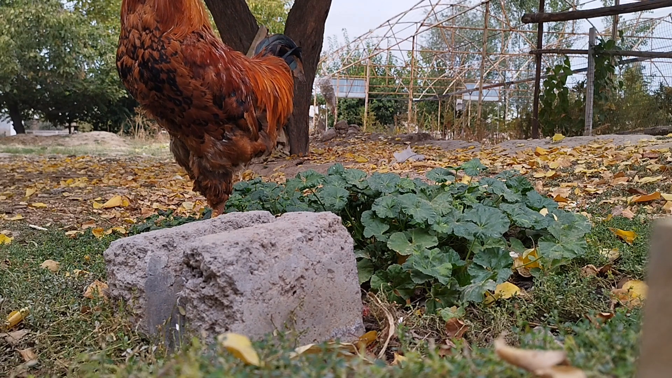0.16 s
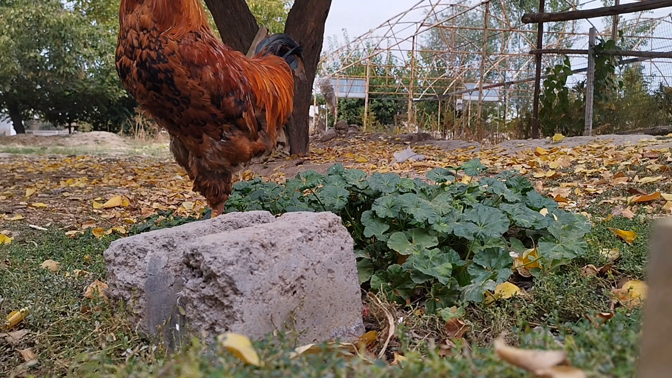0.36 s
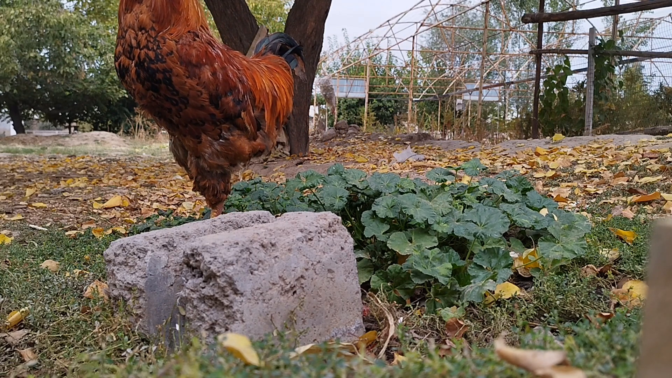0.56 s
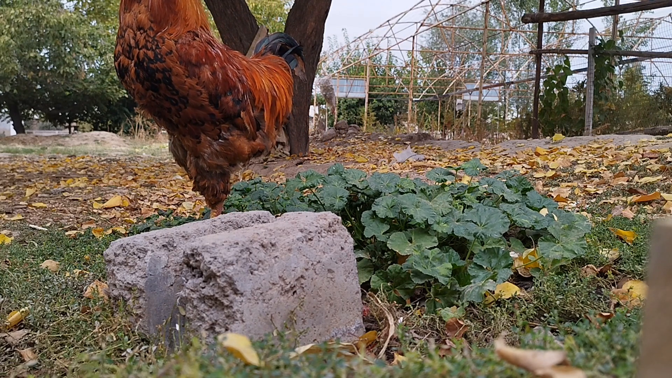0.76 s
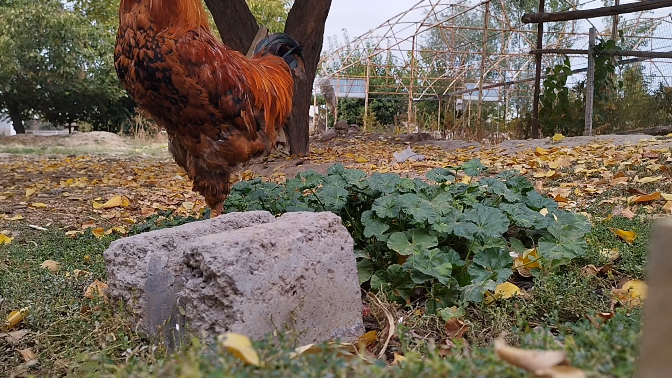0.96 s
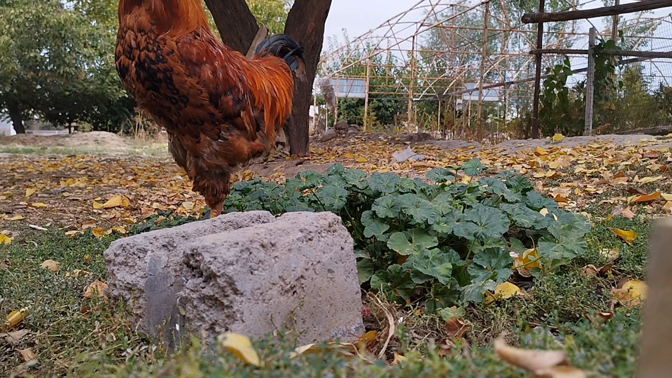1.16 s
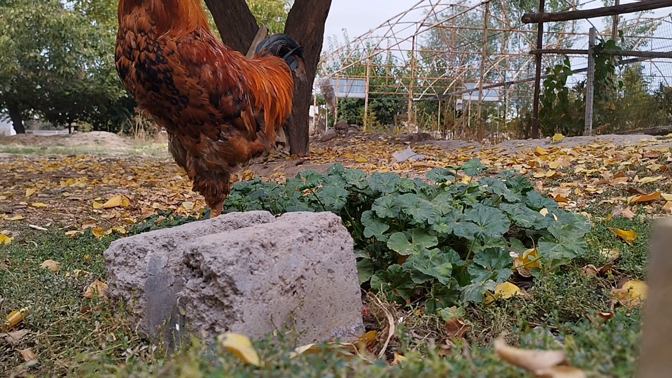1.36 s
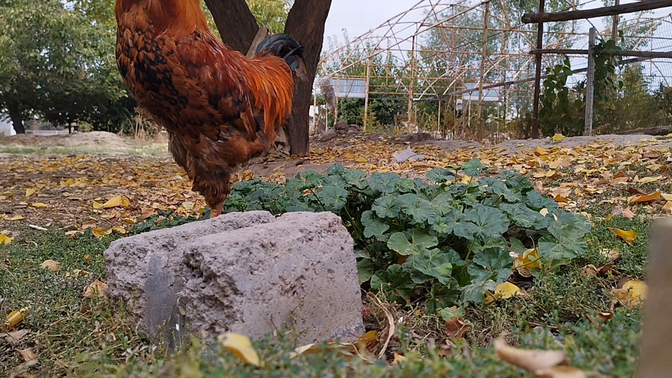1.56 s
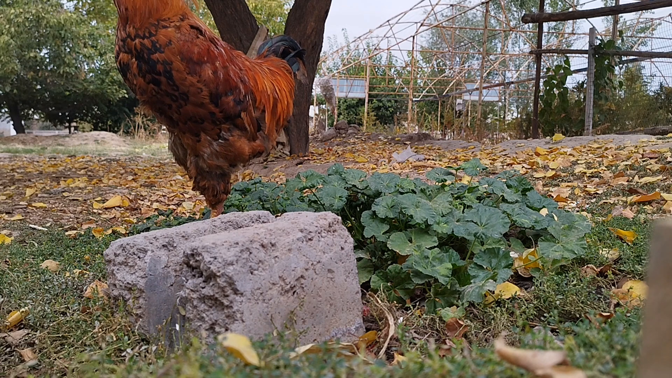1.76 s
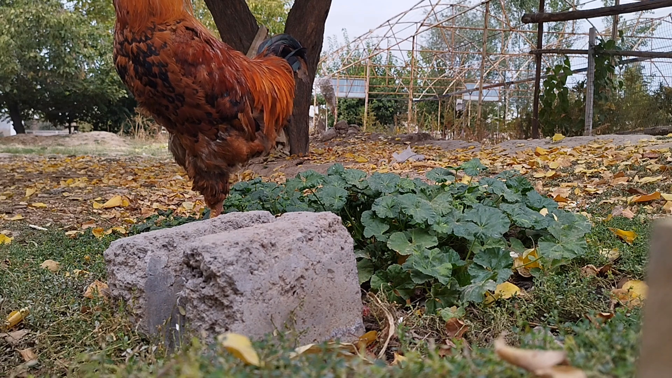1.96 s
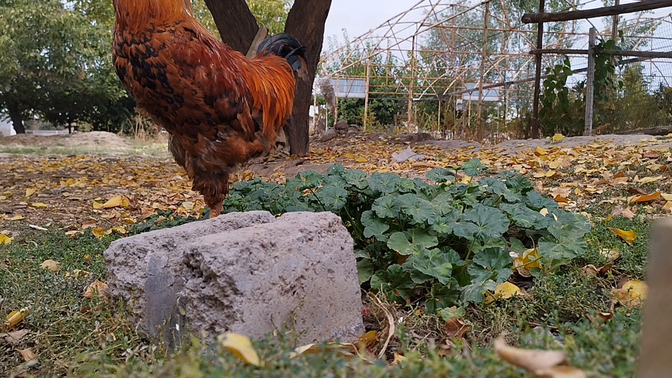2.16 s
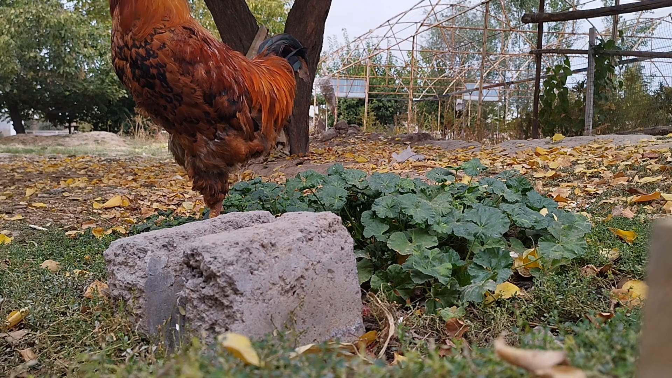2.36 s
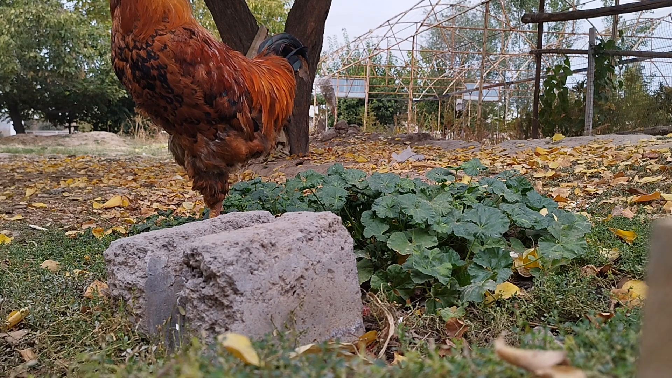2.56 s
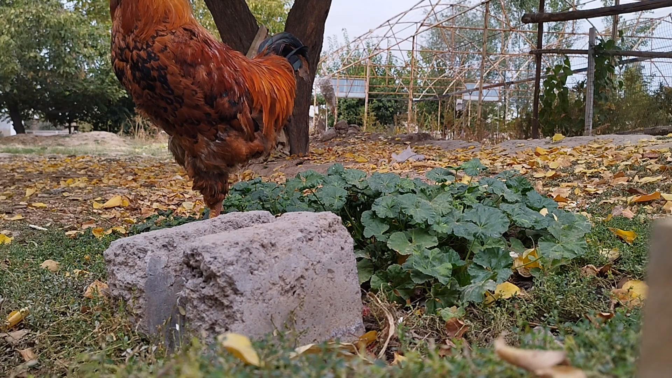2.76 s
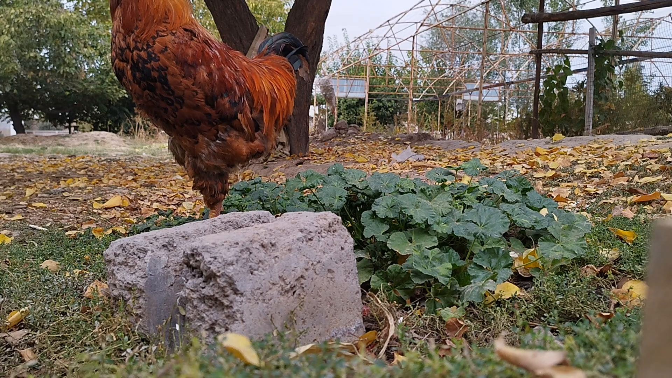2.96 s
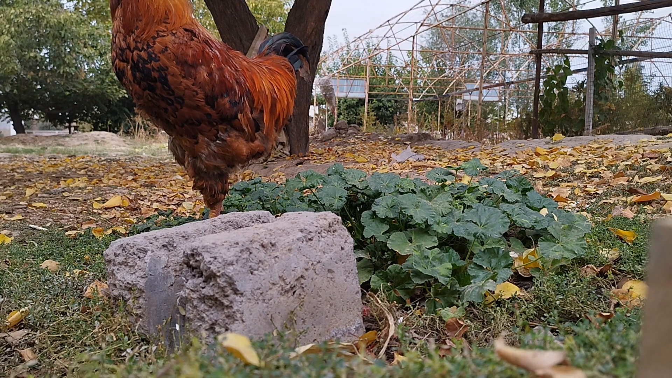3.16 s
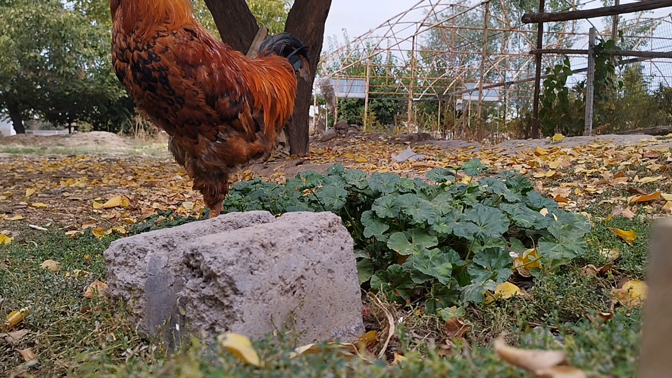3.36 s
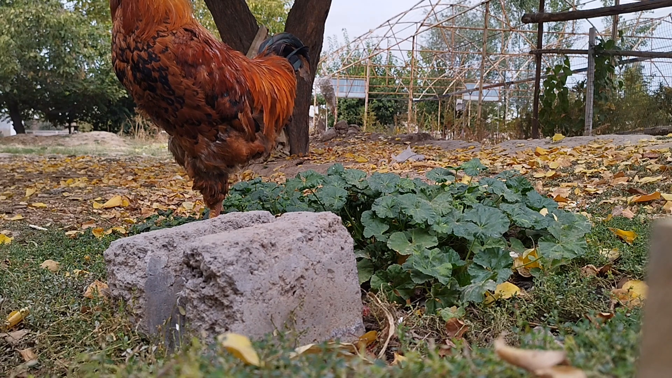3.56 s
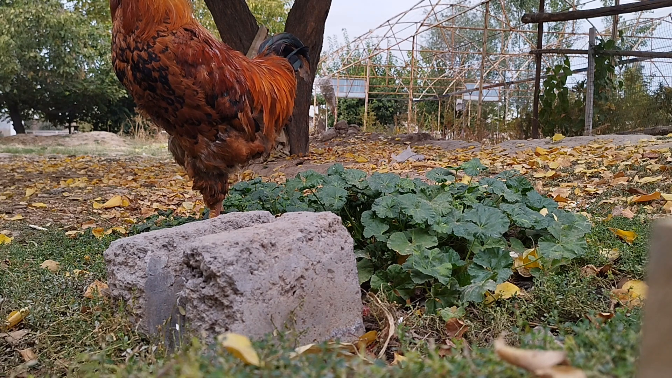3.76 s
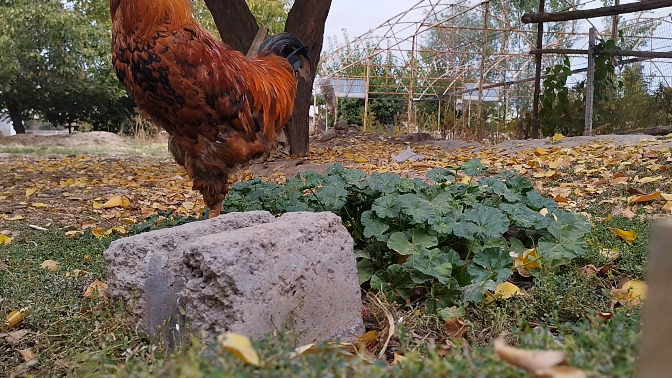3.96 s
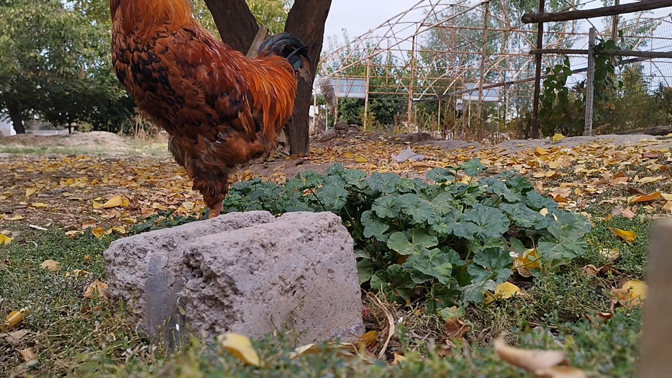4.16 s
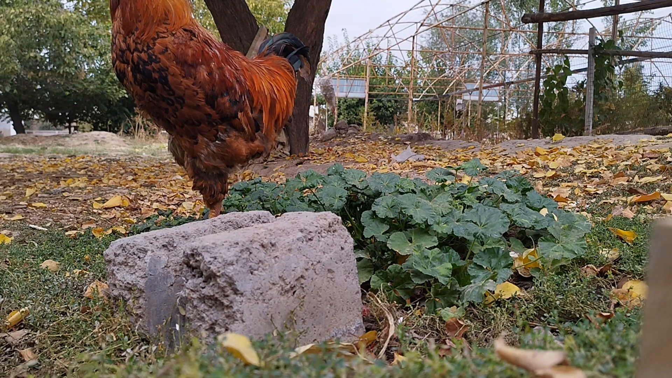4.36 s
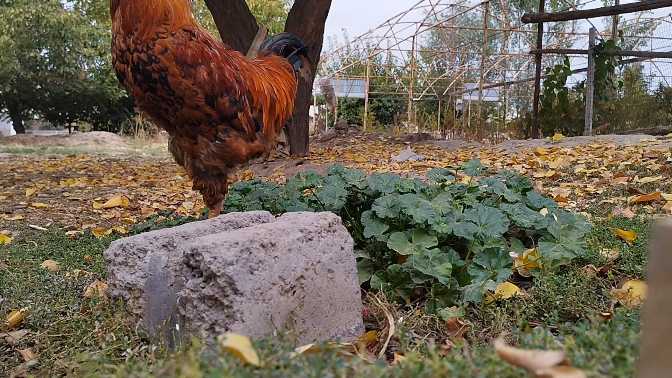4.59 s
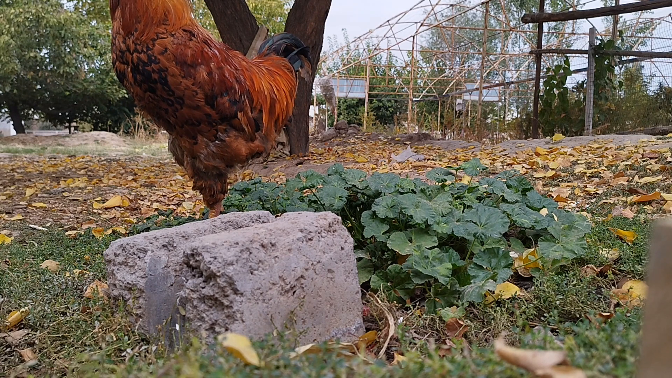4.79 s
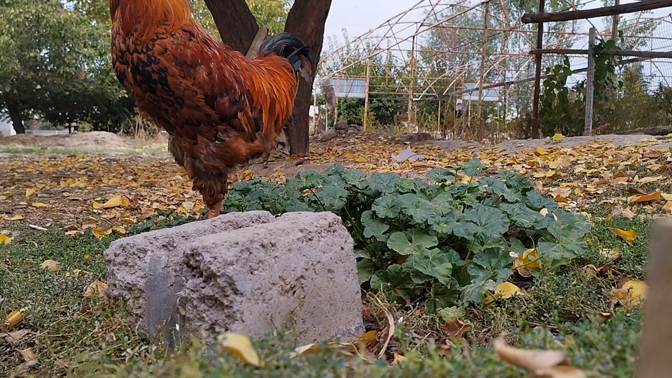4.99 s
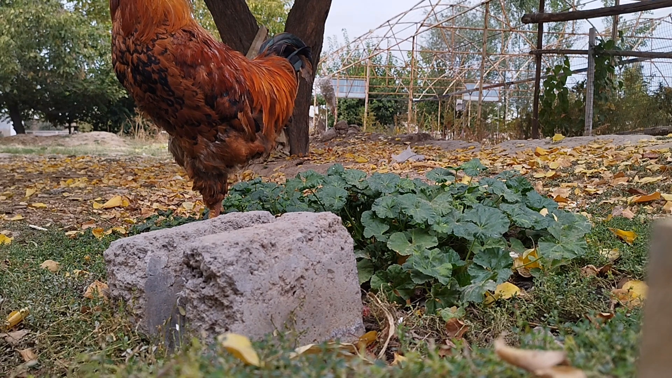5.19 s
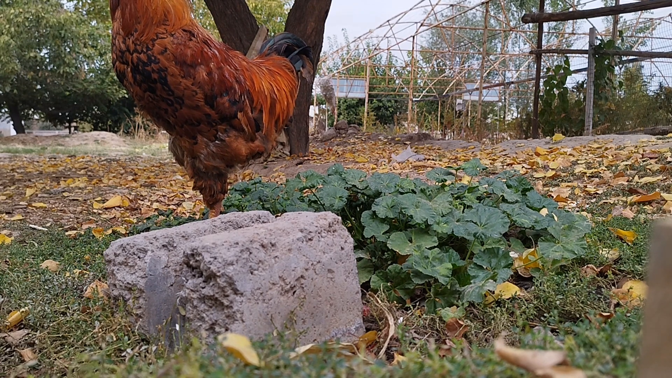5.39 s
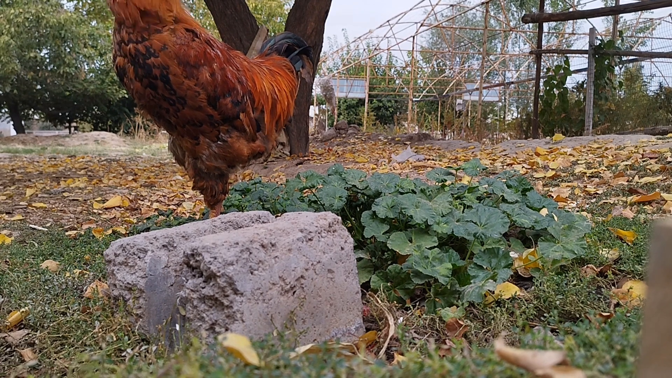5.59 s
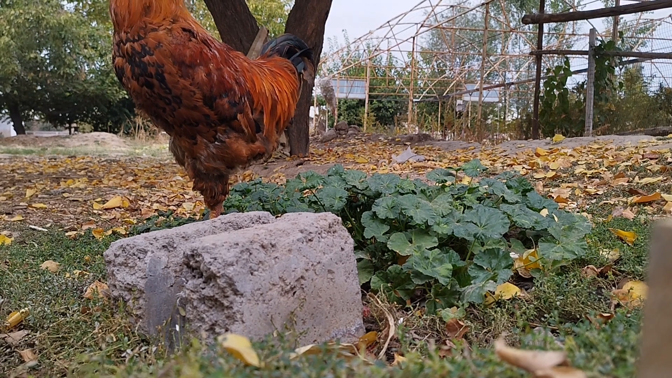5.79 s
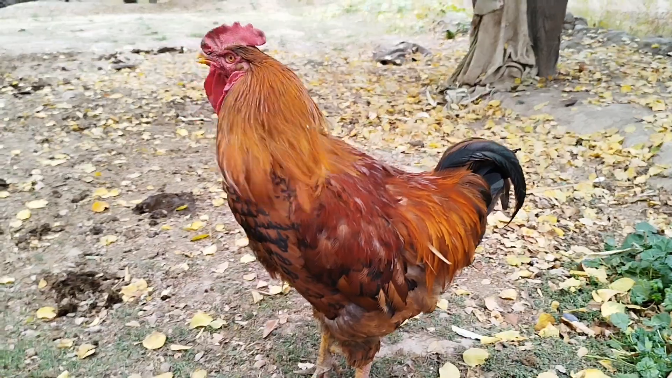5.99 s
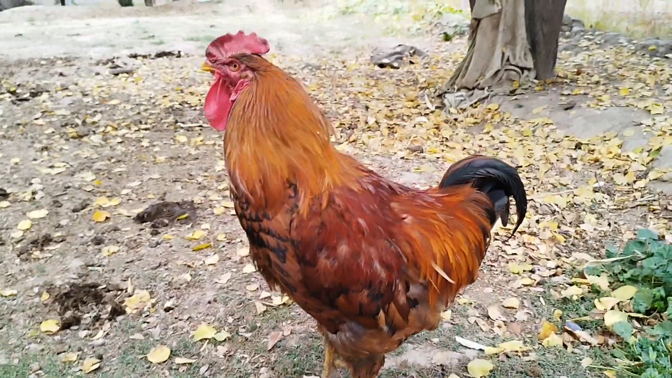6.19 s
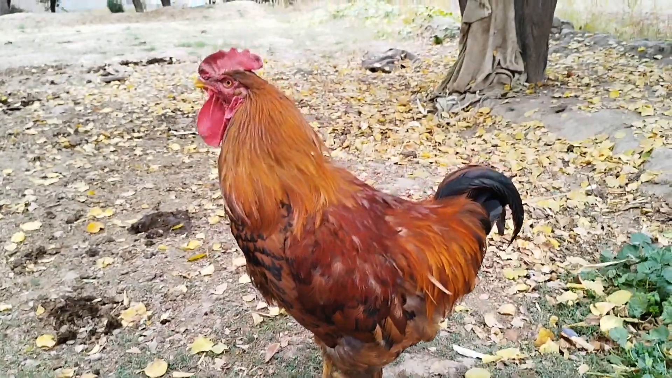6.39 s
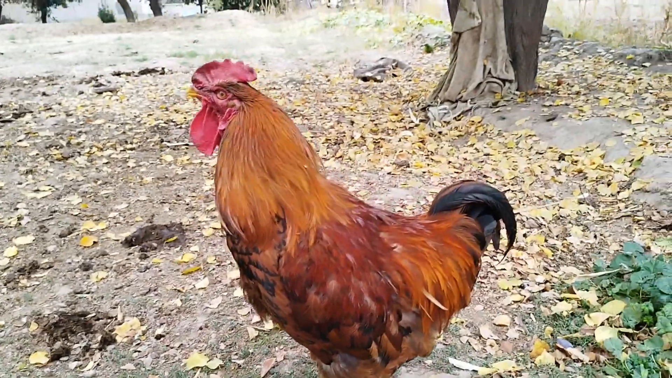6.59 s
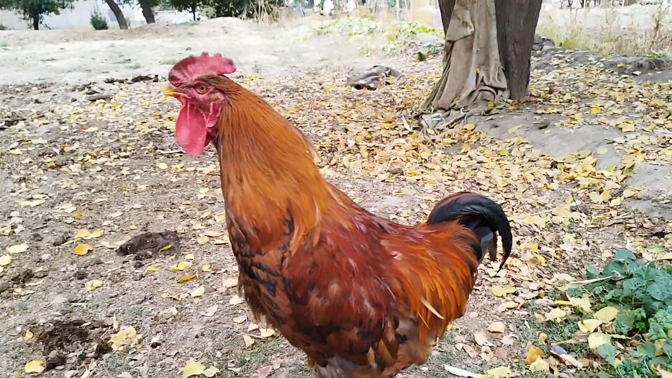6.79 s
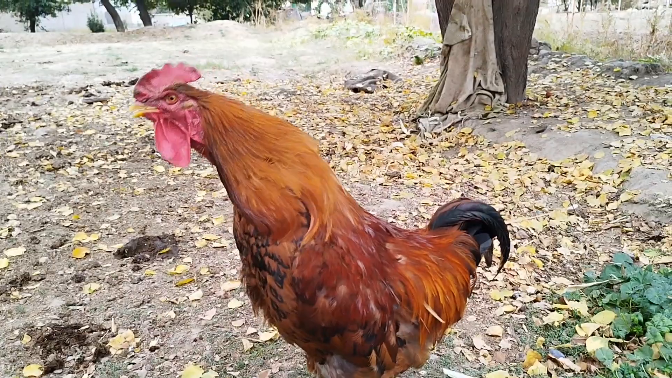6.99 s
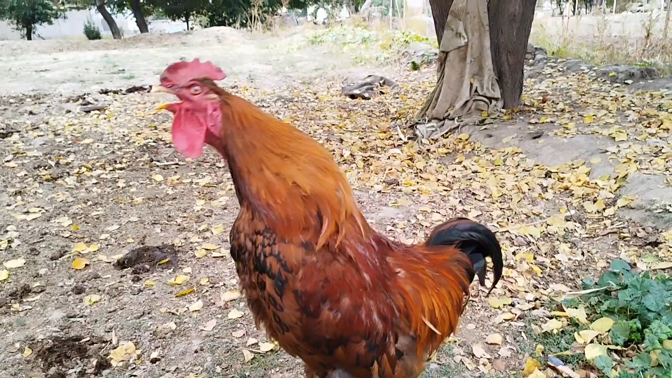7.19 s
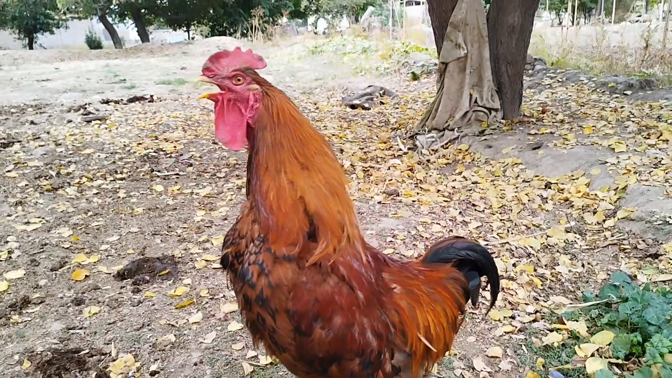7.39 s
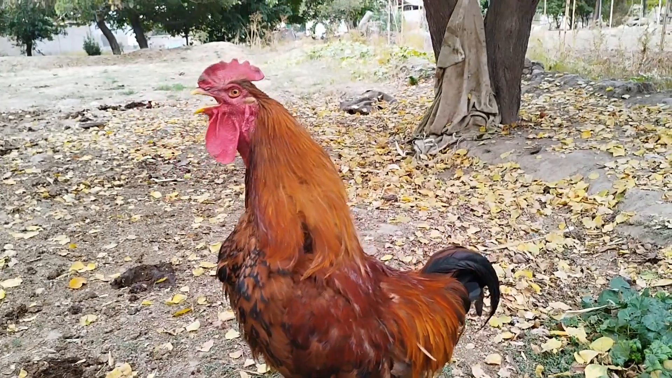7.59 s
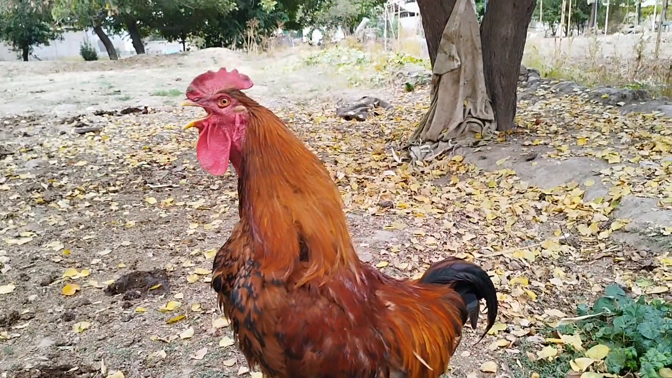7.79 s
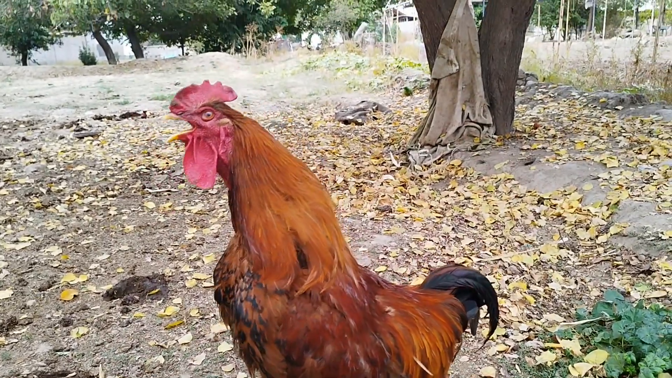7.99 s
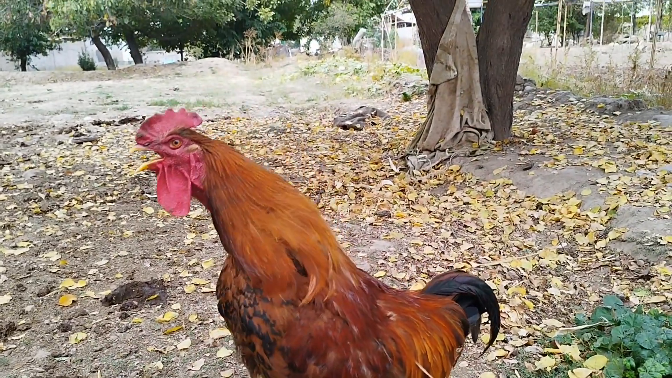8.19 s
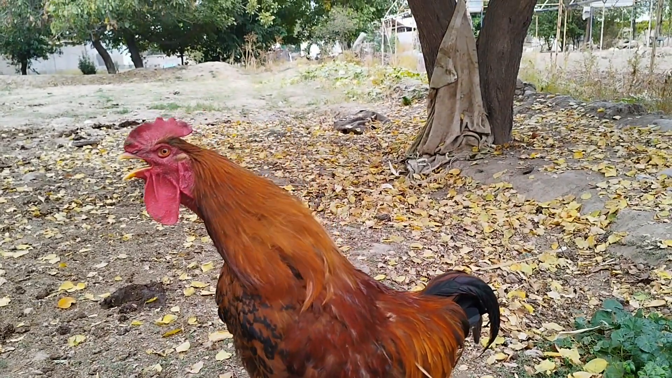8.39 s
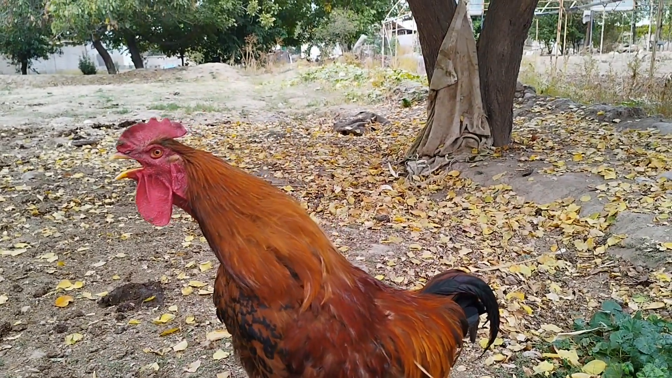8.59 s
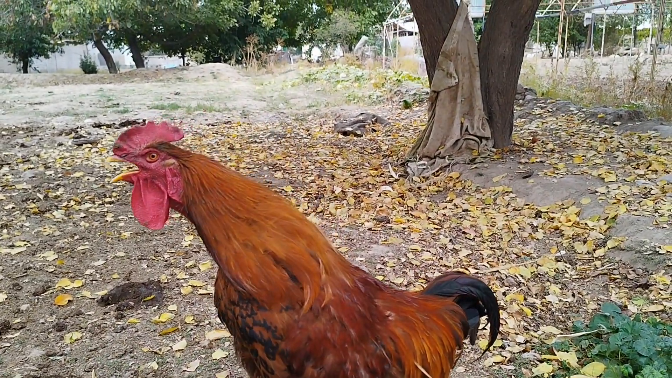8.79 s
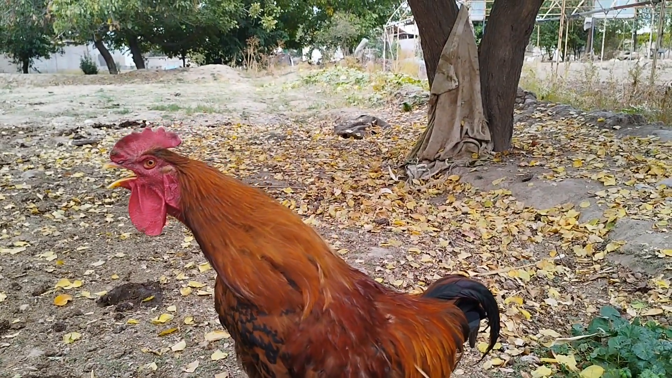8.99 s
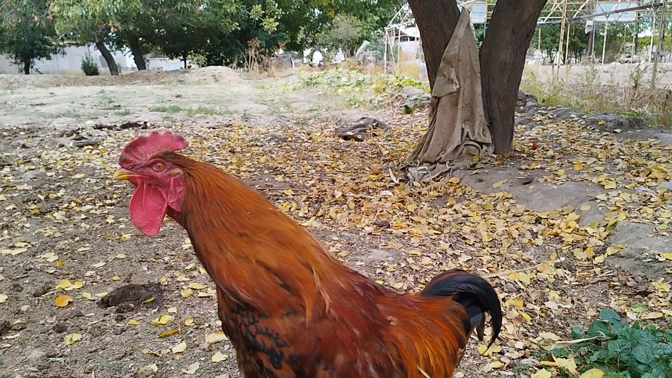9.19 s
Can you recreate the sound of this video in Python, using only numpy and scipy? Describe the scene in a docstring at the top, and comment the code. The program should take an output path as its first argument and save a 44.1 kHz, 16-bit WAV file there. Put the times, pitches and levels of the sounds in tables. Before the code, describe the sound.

An open leafy farmyard in stereo, quiet for the first six seconds. Low distant traffic rumbles under a soft hiss of air in the trees. From 0.5 to 1.5 s come small knocks and dry snaps, the strongest around 0.9 and 1.2 s, with leaf rustles. A small bird trills briefly at 1.6 and 3.8 s; faint far birds chatter near 2.5 s. Light rustles and puffs recur, clearest at 3.6 s, and a faint motor hum rises near 4.9 s. Two tiny whistles sound at 5.8 s, then the level dips almost to silence until 6.0 s. A distant, blurred rooster calls from 6.1 to 7.2 s. At 7.1 s a close rooster crows very loudly, left of center: two short syllables, a rasping stretch from 7.35 s, then a rough held note from 8.0 s, sinking by 9.0 s into a short drop, faint rattle and cluck. Quiet rumble remains.

```python
"""A rooster close by gives one long crow in a leafy farmyard, just after a far rooster calls.
The crow has two short syllables, a rasping stretch and a held note that splits into subharmonics and sinks;
it is a train of air pulses filtered by throat resonances. Before it, the level dips briefly almost to silence.
Around it are noise-burst rustles and puffs, damped clicks, a small bird's frequency-modulated trills, faint
chatter of far birds, and a bed of filtered noise for far traffic and air in the trees, with a motor's hum."""
import sys
import numpy as np
from scipy import signal
from scipy.fft import rfft, irfft, next_fast_len
from scipy.io import wavfile
from scipy.ndimage import uniform_filter1d

SR = 44100
rng = np.random.default_rng(int(sys.argv[2]) if len(sys.argv) > 2 else 0)


def waveform_to_disk(signal):
    """Save audio, clipped to [-1, 1], as 16-bit WAV at the path in sys.argv[1]."""
    frames = np.transpose(np.atleast_2d(signal))
    scaled = np.clip(frames, -1, 1) * 32767
    samples = np.round(scaled).astype(np.int16)
    wavfile.write(sys.argv[1], SR, samples)


N = 407925  # samples
T = np.arange(N) / SR  # seconds
CUTOFF_HZ = 15800  # upper limit of the sound
# The brief near-silence: its start and end in seconds.
SILENCE = (5.86, 5.975)


def from_db(db):
    """Logarithmic level: decibels become an amplitude gain."""
    return 10 ** (np.asarray(db) / 20)


def rms_one(x):
    """Power normalization: scale to unit mean square."""
    return x / np.sqrt(np.mean(x ** 2) + 1e-20)


def in_time(rows, t=T):
    """Linear interpolation: the columns of a time curve, read at times t."""
    times, *columns = np.transpose(rows)
    return [np.interp(t, times, column) for column in columns]


def at_hz(points, hz):
    """Logarithmic frequency scale: interpolate a spectrum along it."""
    f, value = np.transpose(points)
    return np.interp(np.log(hz), np.log(f), value)


def shaped(x, response):
    """Linear filtering: multiply the spectrum by a response given as a function of frequency."""
    size = next_fast_len(x.shape[-1] + 4096, True)
    hz = np.maximum(np.arange(size // 2 + 1) * SR / size, 1)
    return irfft(rfft(x, size) * response(hz), size)[..., :x.shape[-1]]


def drift(rate, t=T):
    """Slow random modulation: spread 1, with a new random target rate times a second."""
    knots = rng.standard_normal(16384)
    return rms_one(np.interp((t - t[0]) * rate, np.arange(len(knots)), knots))


def pulses(phase, pitch):
    """Pulse train: one sharp puff a cycle gives nearly equal harmonics up to about 17 kHz."""
    count = np.floor(17000 / pitch)
    cycle = (phase / (2 * np.pi) + .5) % 1 - .5
    return (count + .5) * np.sinc((2 * count + 1) * cycle) - .5


def placed(x, left_db, lag_ms=0):
    """Interaural cues: a level difference, and a delay on the right, set the direction."""
    right = shaped(x, lambda hz: np.exp(-2j * np.pi * hz * lag_ms / 1e3))
    return np.array([x * from_db(left_db / 2), right * from_db(-left_db / 2)])


def scatter(x, wet_db, t60):
    """Diffuse reflection: ground, trunks and fence return a short exponentially decaying tail."""
    t = np.arange(SR // 2) / SR
    tail = rng.standard_normal((2, len(t))) * from_db(-60 * t / t60) * (t > .002)
    tail /= np.sqrt(np.sum(tail ** 2, axis=1, keepdims=True))
    return x + from_db(wet_db) * signal.fftconvolve(x, tail, axes=1)[:, :x.shape[1]]


# Five frequency bands of the voice. Each row: upper edge in Hz, trim in dB, attack at the start of the
# crow in seconds, dB per octave of pitch, dB per unit of beak opening.
REGISTERS = [(859, -.5, 0.013, -2.5, -8), (1920, 2.5, 0.033, 1, 3), (3650, -15.5, 0.11, 7, -9),
             (7010, -23.5, 0.075, 2, -4), (16100, -21, 0.051, 14, 0.5)]
# Difference between the sides. Each row: frequency in Hz, left minus right in dB.
BEARING = [(400, -4.5), (3300, -7), (7500, -7), (10300, 5.5), (14500, -4.5)]
# Beak in the held note. Each row: time in seconds, opening relative to the usual one (0).
BEAK = [(8.1, 0.29), (8.25, 0.3), (8.58, 0.91), (8.76, 0.32), (8.9, -0.24), (8.97, -0.75)]
# Third register in the held note. Each row: time in seconds, level in dB.
UPPER_MIDS = [(8.434, 5), (8.746, -8), (8.762, 2.5), (8.834, 7.5), (8.955, -16)]
# Two top registers in the held note. Each row: time in seconds, level in dB.
TREBLE = [(8.164, -1.5), (8.284, 5), (8.648, 2.5), (8.732, -13.5), (8.866, 1), (8.955, -0.5)]
# The held note: its start and end in seconds.
HELD_S = (8.032, 8.977)
USUAL_HZ, CROW_S = 706, 7.087  # reference pitch, start of the crow
EBB_S, EBB_LENGTH_S, EBB_DB = 7.329, 0.0083, -5  # the pressure ebbs before the third syllable


def rooster(flutter_db=2.37):
    """Source and filter: the syrinx drives the throat; effort, pitch and beak set each register's level."""
    t = T[7 * SR:]
    pitch, level_db, chest_db, bright_db, rasp, surge_db = notes(t)
    source = syrinx(t, pitch, rasp)
    voice = neck(source, t)
    out = band_flares(source, t)
    unsteady = np.sqrt(np.minimum(rasp, 1))
    held = uniform_filter1d(((t > HELD_S[0]) & (t < HELD_S[1])) * 1., size=600)
    beak = held * in_time(BEAK, t)[0]
    mids_db = held * in_time(UPPER_MIDS, t)[0]
    treble_db = bright_db + held * in_time(TREBLE, t)[0]
    colours_db = chest_db + surge_db, surge_db, mids_db, treble_db, treble_db
    octaves = np.log2(pitch / USUAL_HZ)
    low = 100  # Hz, lower edge of the first register
    for (high, trim_db, attack_s, octave_db, beak_db), colour_db in zip(REGISTERS, colours_db):
        part = shaped(voice, lambda hz: 1 / (1 + (low / hz) ** 20) / (1 + (hz / high) ** 20))
        # dividing by the running power lets the level curves alone set the loudness
        power = uniform_filter1d(uniform_filter1d(part ** 2, size=400), size=400)
        db = level_db + trim_db + colour_db + octave_db * octaves + beak_db * beak
        db = db + flutter_db * unsteady * drift(70, t)
        attack = np.clip((t - CROW_S) / attack_s, 0, 1) ** 2.06
        out = out + part / np.sqrt(np.abs(power) + 1e-12) * from_db(db) * attack
        low = high
    out = out * from_db(EBB_DB * np.exp(-((t - EBB_S) / EBB_LENGTH_S) ** 2))
    # the windpipe smears each puff in time: the higher parts arrive later
    out = shaped(out, lambda hz: np.exp(-1j * (hz / 1500) ** 2))
    out = placed(out, left_db=6.0, lag_ms=0.22)
    out = shaped(out, lambda hz: from_db(at_hz(BEARING, hz) * np.array([[.5], [-.5]])))
    out = np.array([out[0], shaped(out[1], phase_turn)])
    # dry leaves scatter the treble far more than the low tones
    treble = shaped(out, lambda hz: 1 / (1 + (3000 / hz) ** 4))
    out = scatter(out - treble, wet_db=-19.5, t60=0.2) + scatter(treble, wet_db=2.0, t60=0.038)
    return np.pad(out, ((0, 0), (N - len(t), 0)))


# The syrinx jumps from note to note, each lasting until the next, and ends in a faint rattle and a cluck.
# Each row: start in seconds, pitch in Hz, end pitch in Hz, level in dB, chest tone in dB, brightness
# in dB, rasp against tone in dB, crack at the start in dB.
NOTES = [(7.093, 490, 485.8, -18.5, -13, 5, -27.5, -12), (7.142, 501.3, 490, -18.5, 4, -0.5, -23, -29),
         (7.172, 482.2, 495.2, -18, -4, 1, -9, -9), (7.219, 499, 510, -21.5, 4, 0, -24.5, -26),
         (7.264, 629, 572.7, -19, -7.5, -9, -13, -7), (7.295, 463, 451.9, -21.5, -21, -1, -25.5, -24),
         (7.348, 557, 689.6, -18.5, 2, -5.5, -11.5, -12.5), (7.371, 695, 665.3, -20, 1, -1, -24.5, -28),
         (7.481, 613, 622.8, -17, -3.5, -5.5, -10.5, -1.5), (7.546, 702.3, 705, -18.5, 1.5, -6, -11, -15),
         (7.88, 693.7, 632.2, -18, -2, -5, -10.5, -17), (8.032, 698.3, 552, -19.5, 2.5, -0.5, -23.5, -10),
         (8.976, 445, 386.5, -23, -2.5, 3.5, -32, -30), (9.068, 391.4, 288, -21.5, -2.5, 4, -12, -22),
         (9.128, 301.3, 297, -50.5, 6.5, 15, -0.5, -28), (9.235, 440, 424, -33, 2, -8, -3, -15.5)]
# The voice sinks and grows hoarse for a moment. Each row: centre in seconds, time scale of the
# bell-shaped dip in seconds, share of the pitch lost.
STUMBLES = [(7.627, .012, .15), (7.688, 0.0086, 0.07), (7.926, 0.0084, .14), (7.956, .011, .13),
            (8.001, .013, .27), (8.917, 0.031, 0.0041)]
STUMBLE_RASP_DB = 9.5
SAG_POWER, SLUR_S, CRACK_S = 2.05, 0.0097, 0.0232  # pitch gives way ever faster; notes blend; a crack settles
SURGE_DB = 5  # a full crack lifts the two low registers


def notes(t):
    """Register jumps: every note cracks as it begins, may stumble, and bends towards its end."""
    rows = np.array(NOTES)
    which = np.maximum(np.searchsorted(rows[:, 0], t) - 1, 0)
    start, hz, end_hz, level_db, chest_db, bright_db, rasp_db, crack_db = rows[which].T
    age = np.maximum(t - start, 0)
    length = np.diff(rows[:, 0], append=N / SR)[which]
    pitch = hz + (end_hz - hz) * (age / length) ** SAG_POWER
    crack = from_db(crack_db) * np.exp(-(age / CRACK_S) ** 2)
    for s, span, drop in STUMBLES:
        stumble = np.exp(-((t - s) / span) ** 2)
        pitch = pitch * (1 - drop * stumble)
        rasp_db = rasp_db + STUMBLE_RASP_DB * stumble
    rasp = from_db(rasp_db) + crack
    controls = np.array([pitch, level_db, chest_db, bright_db, rasp, SURGE_DB * crack])
    return uniform_filter1d(controls, size=max(int(SLUR_S * SR), 1))


# Subharmonic grouping of the pulses. Each row: start in seconds, end in seconds, pulses per group,
# accent on the first in dB.
GROUPING = [(7.525, 8.051, 2, -12), (8.074, 8.194, 2, -5), (8.21, 8.467, 3, -10.5), (8.468, 8.694, 2, -3),
            (8.86, 8.957, 2, -12.5)]
# The voice flips up an octave. Each row: start in seconds, end in seconds, remaining odd harmonics in dB.
SQUEAKS = [(7.114, 7.144, -34), (7.276, 7.354, -12)]


def syrinx(t, pitch, rasp, jitter=.04, waver=0.0017, shimmer=0.72, hiss_db=-17, switch_s=0.016,
           sharper_db=13, lurch=.045, tear=0.52, breath_db=-4):
    """Nonlinear oscillation: pulses fall into pairs, triplets or an irregular rasp with turbulent noise."""
    unsteady = np.minimum(rasp, 1)
    wobble = jitter * unsteady * drift(260, t) + waver * drift(300, t) + lurch * unsteady * drift(50, t)
    pitch = pitch * (1 + wobble)
    # each puff comes a little early or late, which tears the upper harmonics first
    phase = 2 * np.pi * np.cumsum(pitch) / SR + tear * unsteady * drift(750, t)
    during = lambda start, end: np.clip(np.minimum(t - start, end - t) / switch_s + .5, 0, 1)
    voice = pulses(phase, pitch)
    for start, end, odd_db in SQUEAKS:
        octave_up = pulses(2 * phase, 2 * pitch)
        voice += during(start, end) * (1 - from_db(odd_db)) * (octave_up - voice)
    accents = 0
    for start, end, size, accent_db in GROUPING:
        size = round(size)
        accents += from_db(accent_db) * during(start, end) * pulses(phase / size, pitch / size)
    # accented pulses are sharper too
    voice += shaped(accents, lambda hz: from_db(sharper_db / (1 + (3500 / hz) ** 8)))
    voice *= np.sqrt(pitch / SR) * 2 * (1 + shimmer * unsteady * drift(180, t))
    # air tears through the gap once a cycle, in uneven bursts; in the treble it hisses even on clear notes
    turbulence = rms_one(rng.standard_normal(len(t)) * (1 + np.cos(phase)))
    hiss = shaped(turbulence, lambda hz: 1 / (1 + (5000 / hz) ** 4))
    tearing = turbulence + shaped(turbulence, lambda hz: 2 / (1 + (2600 / hz) ** 6))
    bursts = from_db(1.5 * drift(130, t))
    breath = from_db(breath_db) * np.tanh(rasp * 2) / 2 * tearing * bursts
    return voice + breath + from_db(hiss_db) * hiss


# Windpipe and beak resonances. Each row: width scale in Hz, then frequency in Hz and level in dB with
# the neck upright, then frequency in Hz and level in dB with the neck stretched.
THROAT = [(58.1, 350, -40, 385, -8), (280, 591, 19.5, 562, 18.5), (184, 1224, -0.5, 1209, -2.5),
          (178, 1658, 3.5, 1464, -1), (241, 2722, -14.5, 2437, -8.5), (603, 3450, -17, 3290, -15.5),
          (563, 4480, -15.5, 4540, -15), (325, 5450, -15, 5880, -22), (250, 6340, -18.5, 6750, -29),
          (297, 7300, -22.5, 7000, -22.5), (370, 7860, -30.5, 7680, -14.5), (745, 8750, -32, 9100, -20),
          (1240, 10930, -35, 10920, -21.5), (810, 13700, -42, 14150, -31.5)]
# Throat antiresonances (a positive level is a bump). Each row: width scale in Hz, then frequency in Hz
# and level in dB with the neck upright, then the same two with the neck stretched.
NOTCHES = [(298, 1950, 0, 1950, -2.5), (114, 2970, -9, 2964, -19), (170, 4200, -4, 3860, 1),
           (170, 4980, -18, 4790, -4), (405, 7700, 0.5, 6350, -15)]


def throat(hz, stretch):
    """Formants and antiresonances: steep peaks and notches follow the neck, above a steep low cut."""
    now = lambda upright, stretched: upright + stretch * (stretched - upright)
    peaks = notch_db = 0
    for width, f, db, f2, db2 in THROAT:
        peaks = peaks + from_db(now(db, db2)) / (1 + ((hz - now(f, f2)) / width * 1.16) ** 2) ** 2
    for width, f, db, f2, db2 in NOTCHES:
        notch_db = notch_db + now(db, db2) * np.exp(-((hz - now(f, f2)) / width) ** 2)
    return peaks * from_db(notch_db) / np.sqrt(1 + (290 / hz) ** 10)


# The neck stretches forward: start and end in seconds.
NECK_S = (8.05, 8.43)


def neck(x, t, wander=0.0081):
    """Time-varying filtering: resonances wander a little and glide as the neck stretches."""
    hz, s, frames = signal.stft(x, SR, nperseg=1024)
    wandering_hz = np.maximum(hz, 1)[:, None] * (1 + wander * drift(18, s))
    gain = throat(wandering_hz, np.interp(s + t[0], NECK_S, (0, 1)))
    return signal.istft(frames * gain, SR)[1][:len(x)]


# Bands of the voice that swell briefly. Each row: centre in seconds, time scale of the swell in seconds,
# level in dB, centre frequency in Hz, width scale in Hz.
FLARES = [(7.133, .012, -39, 4130, 700), (7.202, 0.01, -37, 4720, 1090), (7.237, 0.018, -41, 2450, 200),
          (7.268, 0.0086, -40.5, 4720, 800), (7.339, 0.04, -42, 3700, 200), (7.382, 0.017, -40, 8900, 1100),
          (7.556, 0.016, -24.5, 2840, 150), (8.423, 0.26, -39.5, 4880, 840),
          (8.891, 0.091, -35.5, 4670, 260), (9.017, 0.014, -40.5, 4720, 200)]


def band_flares(source, t):
    """Resonance: single narrow or broad bands of the voice, from 2.4 to 9 kHz, swell briefly."""
    out = 0
    for s, length, db, centre_hz, width_hz in FLARES:
        band = shaped(source, lambda hz: 1 / (1 + ((hz - centre_hz) / width_hz) ** 2) ** 2)
        swell = np.exp(-((t - s) / length) ** 2)
        out = out + band * swell * from_db(db) / np.sqrt(np.average(band ** 2, weights=swell))
    return out


def phase_turn(hz, centre_hz=2400, width=200):
    """All-pass resonance: the phase turns once round and the level stays the same."""
    detuning = (hz - centre_hz) / width
    return (1j * detuning - 1) / (1j * detuning + 1)


# Course of the far call. Each row: time in seconds, pitch in Hz, level in dB.
FAR_CROW = [(6.07, 508, -83), (6.24, 539, -75.5), (6.34, 493, -67.5), (6.42, 576.3, -68.5),
            (6.6, 577.5, -66.5), (7.1, 563, -72.5), (7.3, 540, -88)]
# Spectrum of the far call. Each row: frequency in Hz, gain in dB.
FAR_COLOUR = [(580, -4), (1150, -17), (1480, 3), (1730, -4), (2300, -12.5), (4200, -30), (5200, -18),
              (8000, -33)]


def far_rooster():
    """Propagation loss: another pulsed crow, thinned and blurred by distance."""
    pitch, level_db = in_time(FAR_CROW)
    pitch = pitch * (1 + 0.00596 * drift(73))
    puffs = pulses(2 * np.pi * np.cumsum(pitch) / SR, pitch)
    voice = shaped(puffs, lambda hz: from_db(at_hz(FAR_COLOUR, hz)))
    call = rms_one(voice) * from_db(level_db) * (T > SILENCE[1])
    return scatter(placed(call, left_db=-1.5), wet_db=10.5, t60=1.0)


# A small bird's trills. Each row: start in seconds, length in seconds, level in dB.
TRILLS = [(1.639, 0.25, -51), (3.777, 0.26, -50)]
# Course of a trill. Each row: share of its length, pitch in Hz before each side's ratio, level in dB.
TRILL_SHAPE = [(0, 2300, -13), (.2, 2890, -11.5), (.27, 3150, -5.5), (.64, 3130, -5), (1, 2750, -19)]


def small_bird(warble_hz=31.1, depth=0.074, second_db=-6):
    """Frequency modulation: two sides of a small syrinx warble out of step, amid gliding whistles."""
    out = whistles()
    for start, length, db in TRILLS:
        at = np.flatnonzero((T > start) & (T < start + length))
        t = T[at] - start
        pitch, level_db = in_time(TRILL_SHAPE, t / length)
        for ratio, side_db, turn in ((0.99, 0, 0.0089), (.79, second_db, np.pi)):
            warble = depth * np.sin(2 * np.pi * warble_hz * t + turn) + 0.0493 * drift(400, t)
            phase = 2 * np.pi * np.cumsum(ratio * pitch * (1 + warble)) / SR
            tone = np.sin(phase) + from_db(-16.5) * np.sin(2 * phase)
            gain = from_db(db + side_db + level_db + 5.3 * drift(118.8, t))
            out[at] += gain * tone * signal.windows.tukey(len(t), .06)
    return scatter(placed(out, left_db=-5.5, lag_ms=-0.092), wet_db=-5.5, t60=0.4)


# Rising notes round each trill. Each row: seconds after its start, first pitch in Hz, last pitch in Hz,
# level against the trill in dB.
TRILL_NOTES = [(-.07, 2000, 2300, -13.5), (-.038, 2500, 4220, -6.5), (0.223, 2200, 2550, 0.5)]
# Whistles up, then down. Each row: start in seconds, first pitch in Hz, last pitch in Hz, level in dB.
WHISTLES = [(5.755, 2700, 3400, -57.5), (5.797, 3950, 3370, -57)]


def whistles(sweep_s=.05):
    """Exponential chirps: short gliding notes, round the trills and on their own."""
    out, t = np.zeros(N), np.arange(int(sweep_s * SR)) / SR
    round_trills = [(start + after, from_hz, to_hz, db + note_db)
                    for start, _, db in TRILLS for after, from_hz, to_hz, note_db in TRILL_NOTES]
    for s, from_hz, to_hz, db in round_trills + WHISTLES:
        at = round(s * SR)
        glide = signal.chirp(t, from_hz, sweep_s, to_hz, "logarithmic")
        out[at:at + len(t)] += from_db(db) * glide * np.hanning(len(t))
    return out


# Knocks and snapping stalks. Each row: time in seconds, ring level in dB, ring pitch in Hz,
# decay time of the ring in seconds (to about -67 dB).
CLICKS = [(.503, -42, 1830, 0.022), (0.62, -28, 1830, 0.00084), (0.7068, -31.5, 3650, 0.0016),
          (0.9089, -15.5, 656, 0.019), (1.181, -16, 2600, 0.0086), (1.2183, -24, 4700, 0.0044),
          (1.527, -35, 2900, 0.003)]


def clicks(crack_db=-13, crack_decay_s=0.0088):
    """Impulsive excitation: each knock is a brief noisy crack and one quickly damped mode."""
    out, t = np.zeros(N), np.arange(SR // 10) / SR
    for s, db, hz, decay_s in CLICKS:
        ring = np.sin(2 * np.pi * hz * t) * 0.00044 ** (t / decay_s)
        lowpass = signal.butter(2, min(3 * hz, CUTOFF_HZ), fs=SR, output="sos")
        crack = rms_one(signal.sosfilt(lowpass, rng.standard_normal(len(t))))
        crack = crack * 0.0013 ** (t / crack_decay_s)
        at = round(s * SR)
        out[at:at + len(t)] += from_db(db) * (ring + from_db(crack_db) * crack)
    return scatter(placed(out, left_db=-6.5), wet_db=-18, t60=0.35)


# Rustles of leaves and, in the last two rows, faint chirp-like puffs of noise. Each row: centre in
# seconds, time scale of the swell in seconds, level in dB before the balance of the sides,
# nominal band frequency in Hz.
RUSTLES = [(0.529, 0.036, -44.5, 1860), (1.313, 0.088, -48.5, 6300), (1.62, 0.0099, -48.5, 8800),
           (2.179, 0.033, -56, 5770), (3.53, 0.015, -52, 2850), (3.578, 0.041, -46, 3000),
           (3.579, 0.04, -55.5, 7540), (4.1, 0.055, -56, 5360), (4.854, 0.026, -61, 3140),
           (5.548, 0.037, -58.5, 3020)]


def rustles_and_puffs(grain_db=3.5):
    """Granular noise: each event is a swell of crackly band-passed noise."""
    out = np.zeros((2, N))
    for s, length, db, hz in RUSTLES:
        at = np.flatnonzero(abs(T - s) < .3)
        crackle = rng.standard_normal((2, len(at))) * from_db(grain_db * drift(900, T[at]))
        band = signal.butter(1, [hz * 0.73, min(hz * 1.12, CUTOFF_HZ)], "band", fs=SR, output="sos")
        swell = np.exp(-2 * ((T[at] - s) / length) ** 2)
        out[:, at] += rms_one(signal.sosfilt(band, crackle)) * from_db(db) * swell
    return out * from_db([[-2.5], [2.2]])


# Far birds chatter. Each row: centre in seconds, half-length of the swell in seconds, level in dB.
CHATTER = [(2.54, 0.33, -68)]


def far_birds(centre_hz=2120, spread=0.15):
    """Incoherent superposition: six wavering voices, blurred by distance."""
    voices = 0
    for _ in range(6):
        pitch = centre_hz * (1 + spread * drift(160))
        voices = voices + np.sin(2 * np.pi * np.cumsum(pitch) / SR)
    swell = sum(from_db(db) * np.exp(-((T - s) / length) ** 4) for s, length, db in CHATTER)
    return scatter(placed(rms_one(voices) * swell, left_db=-3.5), wet_db=2.5, t60=0.17)


# Spectrum of far traffic until the silence ends. Each row: frequency in Hz, relative density in dB per Hz.
TRAFFIC = [(20, 8), (38, -4), (86, -2.5), (370, -8), (440, -11.5), (646, -20.5), (1140, -34), (2500, -32.5),
           (3250, -40.5), (5500, -120)]
# Spectrum of far traffic afterwards. Each row: frequency in Hz, relative density in dB per Hz.
TRAFFIC_LATER = [(20, 4), (90, -13), (300, -21.5), (600, -26.5), (2500, -31.5), (5000, -63)]
# Spectrum of air in the trees. Each row: frequency in Hz, relative density in dB per Hz.
AIR = [(500, 7.5), (4000, -2), (10000, -7.5), (15500, -21.5)]
# Far traffic until the silence ends. Each row: time in seconds, level in dB.
TRAFFIC_LEVEL = [(1.72, -49.5), (2.2, -43), (2.61, -45.5), (2.86, -49), (3.76, -49), (4.59, -46),
                 (5.65, -44.5)]
# Air in the trees until the silence ends. Each row: time in seconds, level in dB.
AIR_LEVEL = [(0.4, -59), (1.21, -48.5), (1.34, -54), (3.45, -66.5), (4.03, -60.5), (4.61, -64)]
# A motor's hum. Each row: time in seconds, amplitude in dB.
HUM = [(1.2, -60), (3.6, -64), (4.9, -49), (5.8, -71)]
TRAFFIC_LATER_DB, AIR_LATER_DB = -49.5, -63.5  # levels after the silence


def yard(hum_hz=407):
    """Broadband noise: far traffic and a motor's hum under the soft hiss of air in the trees."""
    early = T < SILENCE[1]
    traffic_before = stereo_noise(TRAFFIC) * from_db(in_time(TRAFFIC_LEVEL)[0])
    traffic_after = stereo_noise(TRAFFIC_LATER) * from_db(TRAFFIC_LATER_DB)
    traffic = np.where(early, traffic_before, traffic_after)
    air_db = np.where(early, in_time(AIR_LEVEL)[0], AIR_LATER_DB)
    air = stereo_noise(AIR) * from_db(air_db + 1.2 * drift(30)) * from_db([[-1.2], [1.2]])
    hum = np.sin(2 * np.pi * np.cumsum(hum_hz + 5 * drift(16)) / SR)
    hum = hum * from_db(in_time(HUM)[0] + 2 * drift(2.65))
    return traffic * from_db(1.7 * drift(15)) + air + hum * early


# Likeness of the two sides in diffuse noise. Each row: frequency in Hz, correlation (1 = identical).
LIKENESS = [(25, 0.035), (130, 0.95), (300, 0.33), (1400, 0)]


def stereo_noise(spectrum):
    """Diffuse-field coherence: mid and side noise set how alike the two ears are at each frequency."""
    likeness = lambda hz: np.clip(at_hz(LIKENESS, hz), -.99, .99)
    density = lambda hz: from_db(at_hz(spectrum, hz))
    mid = shaped(rng.standard_normal(N), lambda hz: density(hz) * np.sqrt(1 + likeness(hz)))
    side = shaped(rng.standard_normal(N), lambda hz: density(hz) * np.sqrt(1 - likeness(hz)))
    return rms_one(np.array([mid + side, mid - side]))


def scene():
    """Superposition: all sources in the yard add."""
    return rooster() + far_rooster() + small_bird() + clicks() + rustles_and_puffs() + far_birds() + yard()


def record(dry):
    """Saturation and band limiting: peaks round off above the bass, the level dips, the top is cut."""
    shaved = dry - dry / (1 + (dry / .64) ** 10) ** (1 / 10)
    dry = dry - shaped(shaved, lambda hz: 1 / (1 + (250 / hz) ** 8))
    is_on = uniform_filter1d(((T < SILENCE[0]) | (T > SILENCE[1])) * 1., size=600)
    dipped = dry * np.maximum(is_on, from_db(-50))
    return shaped(dipped, lambda hz: np.clip((CUTOFF_HZ - hz) / 200, 0, 1))


dry = scene()
out = record(dry)
waveform_to_disk(out)
```